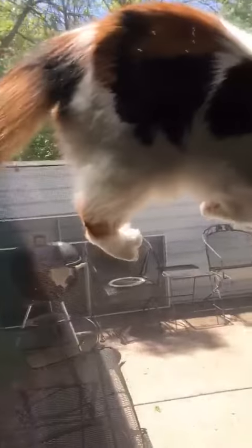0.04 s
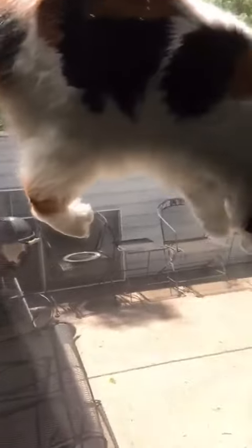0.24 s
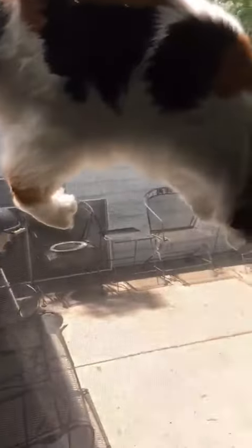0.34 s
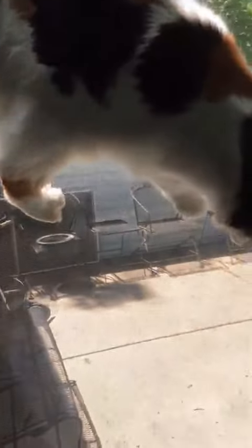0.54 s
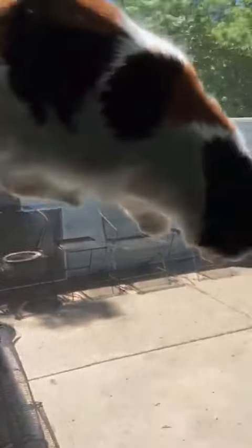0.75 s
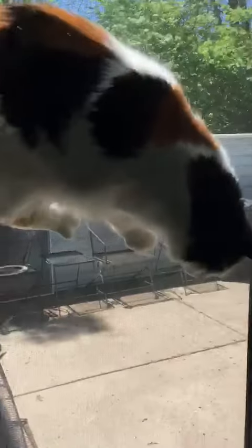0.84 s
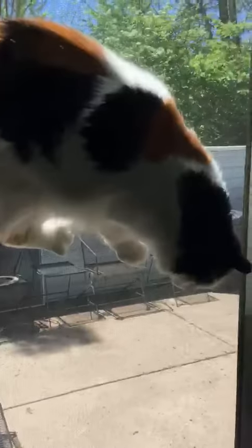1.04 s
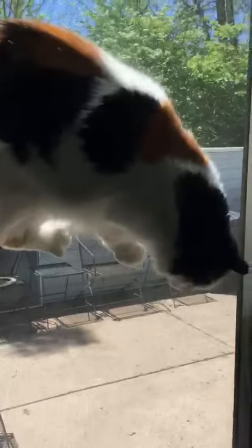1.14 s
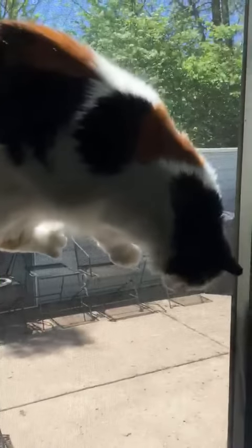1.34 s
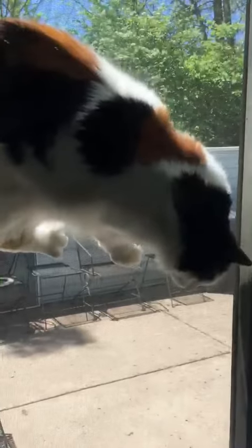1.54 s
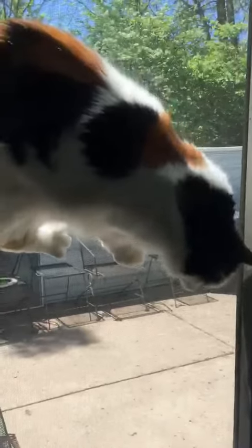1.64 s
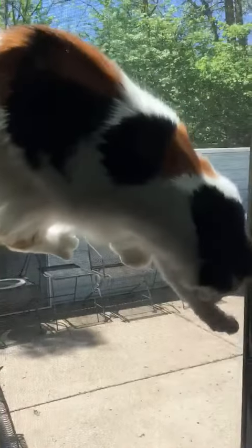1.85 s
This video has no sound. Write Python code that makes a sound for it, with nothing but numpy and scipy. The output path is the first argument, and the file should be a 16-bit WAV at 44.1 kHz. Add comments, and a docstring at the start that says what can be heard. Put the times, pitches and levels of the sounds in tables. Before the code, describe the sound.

Sharp, uneven clicks of cat claws catching on a window screen in a quiet room.

```python
"""A low household hum fills a small room; then come the sharp snaps of a cat climbing a window screen.
Each claw that slips off the mesh ticks, rattles the wires and sets the taut screen ringing in its modes.
A bending wave returns from the far edge, treble first, as a falling chirp, and the room echoes briefly.
The frame booms softly under the push of a paw, and paws rub faintly between the snaps."""
import sys
import numpy as np
from scipy import signal
from scipy.fft import rfft, irfft
from scipy.io import wavfile

SR = 44100
rng = np.random.default_rng(int(sys.argv[2]) if len(sys.argv) > 2 else 0)


def generate_wav(sig):
    """Save sig (samples, or channels by samples) to the path in sys.argv[1] as 16-bit PCM at SR."""
    pcm = np.round(np.clip(np.atleast_2d(sig).T, -1, 1) * 32767).astype(np.int16)
    wavfile.write(sys.argv[1], SR, pcm)


N = 83790

# steady air of the room: frequency_hz, relative_db
AIR_SPECTRUM = [(12, -50), (20, -14.5), (44, -4.5), (172, -14), (204, -10.5), (262, -17), (293, -15),
                (377, -19.5), (410, -20.5), (499, -26.5), (542, -21.5), (759, -24.5), (1030, -22.5),
                (2140, -31.5), (2460, -38), (4300, -42.5), (16000, -53.5)]
# bands of household rumble: centre_hz, width_hz, level_db
RUMBLE_BANDS = [(50.53, 6.9, -57), (76.78, 6.15, -62), (294.81, 6.26, -68.5)]
# harmonics of a motor: pitch_hz, level_db
MOTOR_HARMONICS = [(203, -64.5), (406, -75.5)]
# claw releases: start_s, level_db, presence_db (at 3.2 kHz), treble_db (from 8 kHz up),
# pitch_ratio, rattle_db, wave_db, travel_s (of the returning wave at 1 kHz), echo_db
CLAW_SNAPS = [(0.2153, -7, 3.5, 1, 0.9776, -1.5, -7, 0.00595, -2.5),
              (0.7318, -59.5, 9.5, 10, 1.2, 7, -9, 0.0075, -14),
              (0.7711, -47.5, -2.5, -1, 1.05, 12.5, 13.5, .005, 1),
              (0.9884, -27.5, 9.5, 0.5, 1.01, 6, 5, .005, -2.5),
              (1.5943, -30, -5.5, -3, 1.02, 7, 5.5, 0.00681, -4),
              (1.6332, -14.5, 1.5, 3.5, 0.9903, 1, -5, .008, -1.5),
              (1.8200, -44, -6, -10, 1.04, 4.5, 7.5, 0.00917, 2.5)]
# modes of the taut screen: pitch_hz, level_db, t60_s
MESH_MODES = [(1135.7, -17, 0.038), (1409.8, 2, 0.01782), (1465, -13.5, 0.0305), (1841, -19.5, .022),
              (2242, -20, 0.058), (2314, -17.5, 0.0106), (3285, -18, 0.00792), (4568, -17.5, 0.0157),
              (5493, -17.5, 0.00998), (6800, -36.5, 0.092), (7222, -21, 0.01205), (9134, -23, 0.00654)]
# spectra of the claw tip's tick, the wires' rattle and the returning wave: frequency_hz, relative_db
TICK_SPECTRUM = [(200, -37), (1000, -16.5), (4000, -20), (7000, 0), (10000, -8), (13000, -4.5), (16000, -3),
                 (19000, -28.5)]
RATTLE_SPECTRUM = [(200, -18), (600, -11.5), (1100, 5.5), (1400, 4), (1800, 5.5), (2300, 6.5), (2900, -9.5),
                   (4500, -4.5), (7000, -11), (9500, -16), (11000, -23), (16000, -30)]
WAVE_SPECTRUM = [(120, -33), (280, -12.5), (520, -8), (700, -4), (820, 2.5), (960, -1), (1300, 6),
                 (2000, -8), (3500, -14), (8000, -63)]
# colour of the room's echo: frequency_hz, relative_db
ECHO_SPECTRUM = [(150, 13.5), (500, 9), (900, 5), (1400, 0), (2200, -0.5), (3500, -2.5), (6500, -4),
                 (10000, -3), (15000, -16.5)]
# reverberation time of the room: frequency_hz, t60_s
ECHO_DECAY = [(200, 0.365), (530, 0.324), (1400, 0.2944), (3700, 0.26), (7000, 0.246), (14000, .19)]
# paws loading the frame: start_s, level_db, push_s
PAW_PUSHES = [(.2235, -32, .002), (.777, -29.5, .0064)]
# low modes of the frame: pitch_hz, level_db, t60_s
BOOM_MODES = [(146.8, -16, 0.328), (204.2, -2.5, 0.259), (265.64, 0, 0.25), (285.9, -2.5, 0.23)]
# paws rubbing the mesh: start_s, length_s, level_db
PAW_RUBS = [(0.719, 0.0755, -62), (0.842, 0.156, -63.5), (1.347, 0.073, -68)]
# colour of the rubbing: frequency_hz, relative_db
RUB_SPECTRUM = [(500, -8.5), (1000, -15), (1500, 10.5), (2100, -12), (3000, -19), (5000, -18.5),
                (7000, -20.5), (11000, -34), (16000, -33.5)]

TICK_GAIN_DB, RATTLE_GAIN_DB, WAVE_GAIN_DB, RING_TO_ROOM_DB = -7, 5.5, 8.5, -7.5
MESH_RISE_S, DIRECT_TRAVEL_S = 0.000536, 0.0005057


def undb(db):
    """Decibels to amplitude ratio."""
    return 10 ** (np.asarray(db) / 20)


def unit(x):
    """Scale to an rms of one."""
    return x / np.sqrt(np.mean(x ** 2))


def along(points, hz):
    """Interpolate (frequency_hz, value) points on a log-frequency axis."""
    f, v = np.array(points, float).T
    return np.interp(np.log(np.maximum(hz, 1)), np.log(f), v)


def bins():
    """Frequency of every spectral bin."""
    return np.arange(N // 2 + 1) * SR / N


def noise(spectrum):
    """Spectrally shaped Gaussian noise, rms one."""
    return unit(irfft(rfft(rng.standard_normal(N)) * undb(along(spectrum, bins())), N))


def narrow(hz, width_hz):
    """Narrow-band noise, rms one; centred on zero it is a slow random fluctuation."""
    band = np.exp(-2 * ((bins() - hz) / width_hz) ** 2)
    return unit(irfft(rfft(rng.standard_normal(N)) * band, N))


def impulse(spectrum):
    """Minimum phase: the shortest causal pulse of a given spectrum, with unit energy."""
    cepstrum = irfft(np.log(undb(along(spectrum, bins()))), N)
    cepstrum[1:N // 2] *= 2
    cepstrum[N // 2 + 1:] = 0
    return unit(irfft(np.exp(rfft(cepstrum)), N)) / np.sqrt(N)


def fade(t, t60_s):
    """Exponential damping by 60 dB in t60_s."""
    return np.exp(-np.log(1000) * t / t60_s)


def ring(modes, t, rise_s, pitch_ratio=1):
    """Modal superposition: damped sinusoids that take a moment to build up."""
    partials = (undb(db) * np.sin(2 * np.pi * hz * pitch_ratio * t) * fade(t, t60_s)
                for hz, db, t60_s in modes)
    return (1 - np.exp(-t / rise_s)) * sum(partials)


def delay(x, delay_s):
    """Shift a sound later in time."""
    return np.concatenate([np.zeros(max(int(delay_s * SR), 0)), x])[:N]


def household_hum(t, air_db=-55.5, waver_db=2.5, waver_hz=2.92, drift_rad=0.524):
    """Random amplitude and phase modulation make a motor's harmonics waver over air noise and rumble."""
    out = undb(air_db) * noise(AIR_SPECTRUM)
    out += sum(undb(db) * narrow(hz, width_hz) for hz, width_hz, db in RUMBLE_BANDS)
    for hz, db in MOTOR_HARMONICS:
        phase = 2 * np.pi * hz * t + drift_rad * narrow(0, waver_hz)
        out += np.sqrt(2) * undb(db + waver_db * narrow(0, waver_hz)) * np.sin(phase)
    return out


def claw_snaps(t):
    """Impulsive excitation: each released claw ticks, rings and rattles the mesh and launches a wave."""
    out = np.zeros(N)
    for (start_s, level_db, presence_db, treble_db, pitch_ratio,
         rattle_db, wave_db, travel_s, echo_db) in CLAW_SNAPS:
        vibration = ring(MESH_MODES, t, MESH_RISE_S, pitch_ratio)
        tone = disperse(mesh_radiation(vibration), DIRECT_TRAVEL_S)
        tick = undb(TICK_GAIN_DB) * impulse(TICK_SPECTRUM)
        rattle = undb(RATTLE_GAIN_DB + rattle_db) * wire_rattle(t)
        returning_wave = undb(WAVE_GAIN_DB + wave_db) * disperse(impulse(WAVE_SPECTRUM), travel_s)
        crack = tick + rattle + returning_wave
        into_room = crack + undb(RING_TO_ROOM_DB) * tone
        echo = undb(echo_db) * signal.fftconvolve(into_room, room_response(t))[:N]
        snap = delay(tone + crack + echo, start_s)
        colour_db = along([(2000, 0), (3200, presence_db), (8000, treble_db)], bins())
        out += irfft(rfft(snap) * undb(level_db + colour_db), N)
    return out


def mesh_radiation(vibration, cutoff_hz=833):
    """Radiation efficiency: an open mesh gives off little sound below its cutoff."""
    return signal.sosfilt(signal.butter(3, cutoff_hz, "highpass", fs=SR, output="sos"), vibration)


def disperse(x, travel_s, exponent=0.9):
    """Dispersion of bending waves: the lower a frequency, the later it arrives."""
    group_delay_s = travel_s * (1000 / np.maximum(bins(), 100)) ** exponent
    phase_lag = 2 * np.pi * np.cumsum(group_delay_s) * SR / N
    return irfft(rfft(x) * np.exp(-1j * phase_lag), N)


def wire_rattle(t, t60_s=0.049):
    """Damped irregular vibration: the wires radiate a short burst of noise."""
    wires = noise(RATTLE_SPECTRUM) * fade(t, t60_s) * (1 - np.exp(-t / MESH_RISE_S))
    return mesh_radiation(unit(wires)) / np.sqrt(N)


def room_response(t, gain_db=-6, gap_s=0.004, rise_s=0.00225):
    """Diffuse reverberation: each band decays exponentially, the treble fastest."""
    spectrum, hz = rfft(noise(ECHO_SPECTRUM)), bins()
    edges_hz = np.geomspace(60, SR / 2, 14)
    tail = np.zeros(N)
    for low, high in zip(edges_hz, edges_hz[1:]):
        band = irfft(spectrum * ((hz >= low) & (hz < high)), N)
        tail += band * fade(t, along(ECHO_DECAY, np.sqrt(low * high)))
    tail *= 1 - np.exp(-t / rise_s)
    return undb(gain_db) * delay(unit(tail), gap_s) / np.sqrt(N)


def frame_booms(t):
    """Forced response: a paw's push drives the frame's modes; a longer push sounds deeper."""
    out = np.zeros(N)
    response = ring(BOOM_MODES, t, rise_s=0.0101)
    for start_s, level_db, push_s in PAW_PUSHES:
        force = np.sin(np.pi * np.minimum(t / push_s, 1)) ** 2
        boom = signal.fftconvolve(response, force / force.sum())[:N]
        out += undb(level_db) * delay(boom, start_s)
    return out


def paw_rubs(t, grain_db=4, grain_samples=100):
    """Sliding friction: grainy noise swells and fades as the cat shifts its weight."""
    grains = rng.standard_normal(N)
    roughness = np.repeat(rng.standard_normal(N // grain_samples + 1), grain_samples)[:N]
    grains *= undb(grain_db * roughness)
    pressure = np.zeros(N)
    for start_s, length_s, level_db in PAW_RUBS:
        arch = np.sin(np.pi * np.clip((t - start_s) / length_s, 0, 1))
        pressure += undb(level_db) * np.sqrt(np.maximum(arch, 0))
    return pressure * unit(signal.fftconvolve(grains, impulse(RUB_SPECTRUM))[:N])


def scene():
    """Superposition: snaps, booms, rubbing and hum add in one channel."""
    t = np.arange(N) / SR
    return (claw_snaps(t) + frame_booms(t) + paw_rubs(t) + household_hum(t))[None]


def record(dry, low_cut_hz=39.5, high_cut_hz=16300):
    """Band limiting: filters remove the deepest rumble and the highest treble."""
    thinned = signal.sosfilt(signal.butter(4, low_cut_hz, "highpass", fs=SR, output="sos"), dry)
    return signal.sosfilt(signal.ellip(8, .2, 70, high_cut_hz, fs=SR, output="sos"), thinned)


dry = scene()
out = record(dry)
generate_wav(out)
```